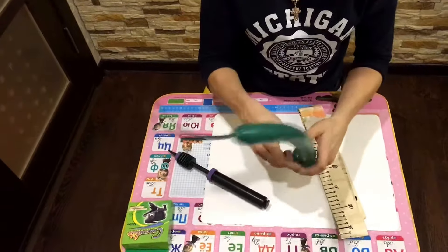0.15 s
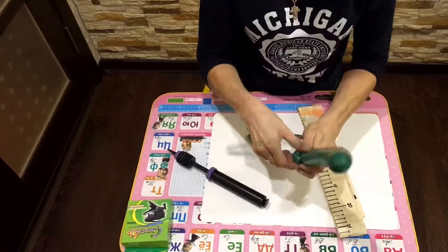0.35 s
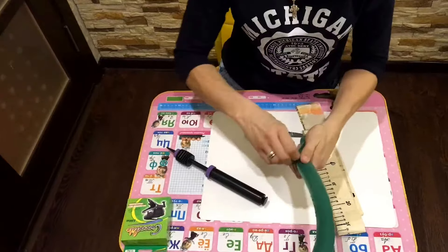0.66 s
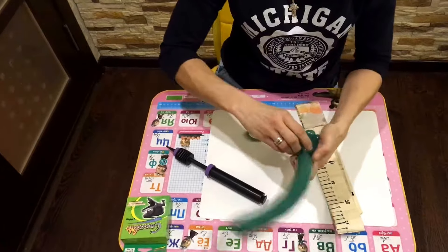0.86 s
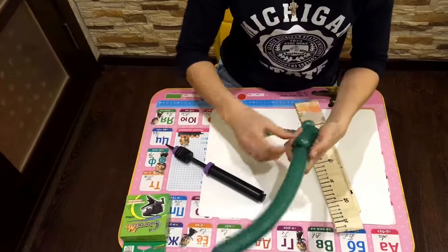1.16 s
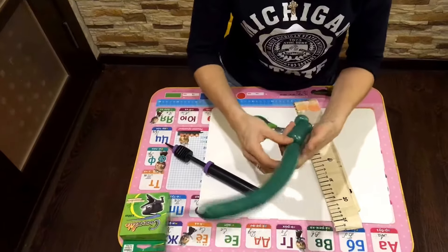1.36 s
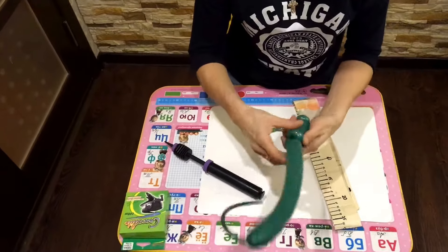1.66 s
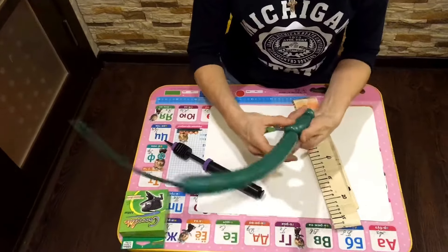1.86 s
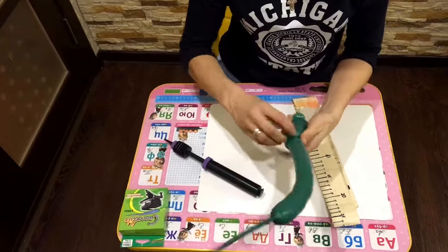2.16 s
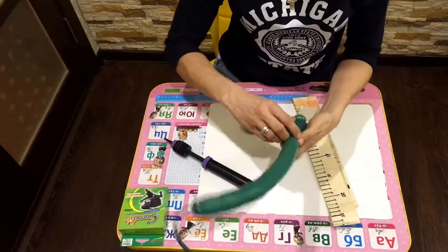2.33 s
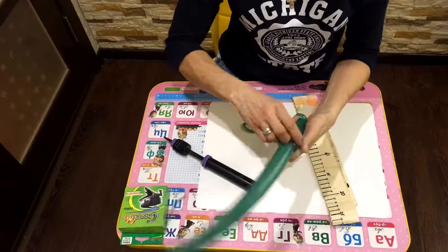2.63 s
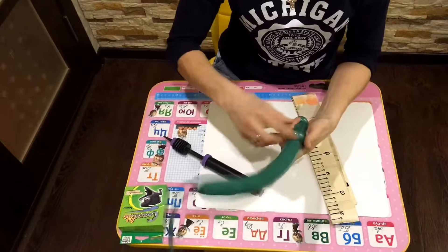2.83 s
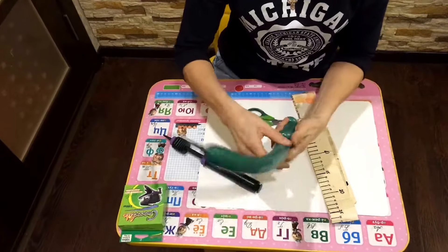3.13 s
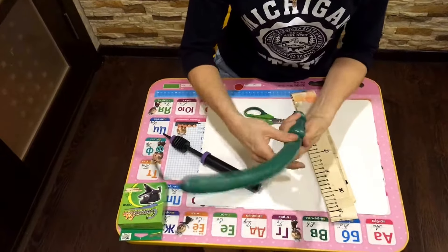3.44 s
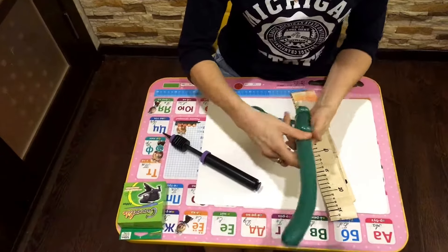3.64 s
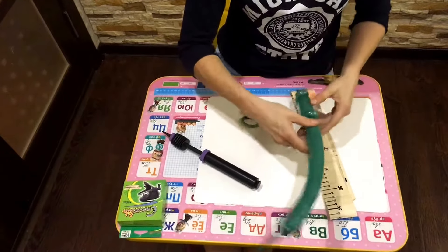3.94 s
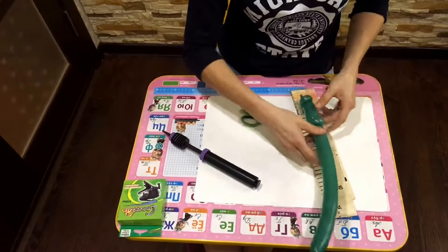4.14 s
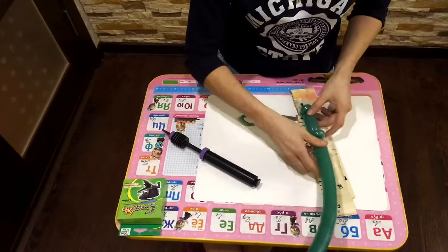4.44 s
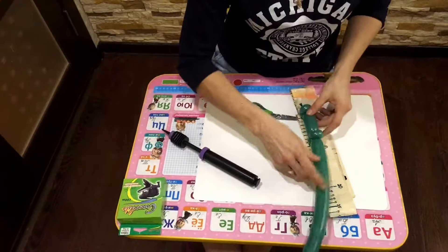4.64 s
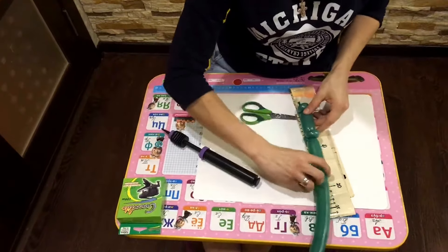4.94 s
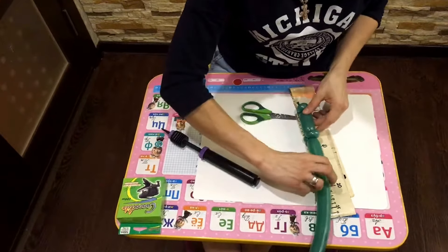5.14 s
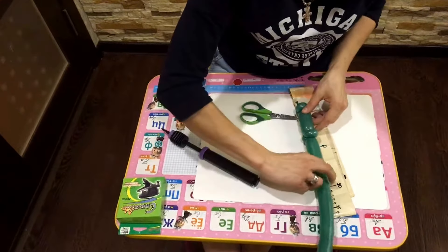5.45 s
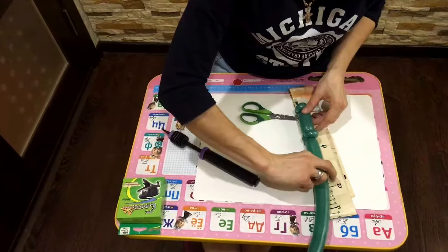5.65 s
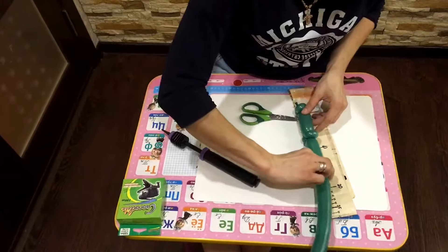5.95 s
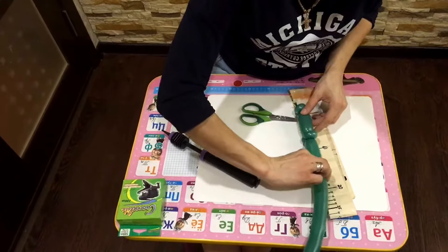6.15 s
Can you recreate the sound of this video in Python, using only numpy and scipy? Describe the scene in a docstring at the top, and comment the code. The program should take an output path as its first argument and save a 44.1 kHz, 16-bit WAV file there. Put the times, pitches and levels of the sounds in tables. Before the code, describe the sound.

A long latex balloon is handled nearby in a small, quiet room with a short echo. From the start until about 3.8 seconds, hands twist it in irregular bursts: bright friction crackles, duller rubbing, sharp snaps and soft knocks that make the air inside hum. The strongest snaps come near 0.6, 1.9, 2.5 and 3.4 seconds. Brief rasps, tiny squawks and thin wavering whines appear among them, and a short squeak rises and falls at 3.3 seconds. From 4 seconds the sound becomes softer as a palm brushes along the balloon, with a low murmur and a few light bumps. A faint hiss runs from about 4.5 to 5.4 seconds, and a nudged ruler rings faintly between 4.5 and 4.9. Short juddering finger strokes continue over the skin, with little squawks near 5.8 seconds, before the rubbing fades around 6.3 seconds.

```python
"""A long latex balloon is twisted by hand over a table in a small quiet room.
From the start the stretched rubber sticks and slips: friction crackles, the air tube murmurs, knocks
bounce along it and bright snaps break loose. Rasps, squawks and thin whines join within the first
second, and a short squeak comes at 3.3 s. From 4 s a palm smooths the balloon flat along a ruler;
from 4.5 s it hisses faintly, soft finger strokes judder over the skin and the nudged ruler rings."""
import sys
import numpy as np
from scipy import signal
from scipy.fft import rfft, irfft, next_fast_len
from scipy.io import wavfile
from scipy.ndimage import uniform_filter1d

SR = 44100
rng = np.random.default_rng(int(sys.argv[2]) if len(sys.argv) > 2 else 0)


def store_wav(level_fs):
    """Save 16-bit WAV to argv[1]."""
    pcm = np.round(np.clip(np.atleast_2d(level_fs), -1, 1) * 32767)
    wavfile.write(sys.argv[1], SR, pcm.T.astype(np.int16))


N = 277389
TIME = np.arange(N) / SR


def from_db(db):
    """Decibels to gain."""
    return 10 ** (np.asarray(db) / 20)


def rms_one(x):
    """Scale to unit rms."""
    return x / np.sqrt(np.mean(x ** 2) + 1e-20)


def gain_curve(rows, column):
    """A dB column as gain over time, silent outside its rows."""
    rows = np.array(rows)
    return from_db(np.interp(TIME, rows[:, 0], rows[:, column], left=-120, right=-120))


def at_hz(points, hz):
    """Read a table on a log-frequency axis."""
    points = np.array(points)
    return np.interp(np.log(hz + 1), np.log(points[:, 0]), points[:, 1])


def coloured(x, spectrum):
    """Give a signal a smooth spectral shape."""
    size = next_fast_len(N + SR // 10)
    gain = from_db(at_hz(spectrum, np.fft.rfftfreq(size, 1 / SR)))
    return irfft(rfft(x, size) * gain, size)[:N]


def band(x, low_hz, high_hz, order=2):
    """Causal band-pass."""
    high_hz = min(high_hz, SR * .47)
    low_hz = min(low_hz, high_hz / 2)
    return signal.sosfilt(signal.butter(order, [low_hz, high_hz], "band", fs=SR, output="sos"), x)


def resonance(x, hz, q):
    """One resonant band, unit gain at its peak."""
    return signal.lfilter(*signal.iirpeak(hz, q, SR), x)


def resonate(x, modes):
    """A sound plus the hum it leaves in the tube's air."""
    return x + sum(from_db(db) * resonance(x, hz, q=hz / width_hz) for hz, width_hz, db in modes)


def add(out, start_s, sound):
    """Mix a sound in at its start time."""
    start = max(0, round(start_s * SR))
    out[start:start + len(sound)] += sound[:max(0, N - start)]


def pressure(length_s, rise_s, fall_s):
    """A contact breaks away, slides for a while and stops."""
    t = TIME[:SR * 3 // 4]
    return (1 - np.exp(-t / rise_s)) * np.exp(-np.maximum(t - length_s, 0) / fall_s)


def contacts(rows, column, rise_s, fall_s):
    """Gain over time of contacts that each swell, hold a level and fade."""
    out = np.zeros(N)
    for row in rows:
        start_s, length_s = row[:2]
        add(out, start_s, from_db(row[column]) * pressure(length_s, rise_s, fall_s))
    return out


def tremble(size, window_samples):
    """A fast random wander; rms 1."""
    return rms_one(uniform_filter1d(rng.standard_normal(size), size=window_samples))


def drift(per_s):
    """A slow random wander."""
    steps = rng.standard_normal(2048)
    return np.interp(TIME * per_s, np.arange(len(steps)), steps)


def shifting(x, depth_db, per_s):
    """The skin's close resonances come and go as the grip changes its tension; rms 1."""
    return rms_one(sum((-1) ** k * from_db(depth_db * drift(per_s)) * resonance(x, hz, q=7)
                       for k, hz in enumerate(np.geomspace(450, 15000, 22))))


def slip_noise(slip_energy, slip_s, smooth):
    """Each slip is a dying noise burst, over a share of smooth sliding; rms 1."""
    power = signal.lfilter([1], [1, -np.exp(-2 / (slip_s * SR))], slip_energy + 1e-18)
    return rms_one(np.sqrt(power / power.mean() + smooth) * rng.standard_normal(len(power)))


def friction(per_s, spread_db, slip_s, smooth):
    """Micro-slips at random times; rms 1."""
    sizes = from_db(spread_db * np.minimum(rng.exponential(1, N), 3))
    slipping = rng.random(N) < per_s / SR
    return slip_noise(slipping * sizes ** 2, slip_s, smooth)


def slip_train(per_s, size, jitter, spread_db, slip_s, smooth):
    """Stick and slip in an uneven rhythm; rms 1."""
    gaps, sizes = rng.standard_normal((2, 2400))
    onsets = (np.cumsum(np.exp(jitter * gaps)) * SR / per_s).astype(int)
    inside = onsets < size
    slip_energy = np.zeros(size)
    slip_energy[onsets[inside]] = from_db(spread_db * np.clip(sizes[inside], -1.5, 1.5)) ** 2
    return slip_noise(slip_energy, slip_s, smooth)


def burst(centre_hz, decay_s, width, crack):
    """One release: a sharp crack and a dying shiver of the skin, in a broad band."""
    t = TIME[:SR // 20]
    fade = np.exp(-t / decay_s)
    shiver = rng.standard_normal(len(t)) * fade
    shiver[2] += crack
    # slack skin scatters the pulse in time and favours no frequency
    phases = np.angle(rfft(shiver, 2 * len(t)))
    scattered = irfft(np.exp(1j * phases))[:len(t)]
    sound = band(scattered, centre_hz / width, centre_hz * width, order=1)
    sound = band(sound, centre_hz / width ** 2, SR / 2, order=1)
    return rms_one(sound) * np.sqrt(np.mean(fade ** 2))


def ring(hz, decay_cycles=3.5):
    """The taut skin swings on at one pitch and dies away."""
    cycles = hz * TIME[:SR // 5]
    return np.sin(2 * np.pi * cycles) * np.exp(-cycles / decay_cycles)


# Background spectrum. Each row: frequency in Hz, gain in dB.
AIR_SPECTRUM = [(18, -60), (35, -9.5), (123, -7), (225, -14), (360, -17), (2910, -23), (15500, -36)]


def still_air(level_db=-71):
    """The quiet room's steady, low noise."""
    return from_db(level_db) * rms_one(coloured(rng.standard_normal(N), AIR_SPECTRUM))


# The hands grip and turn. Each row: start in seconds, length in seconds, crackle in dB, rub in dB,
# relative tube murmur in dB.
TWISTS = [(0, 0.32, -54.5, -62, -62), (.355, 0.096, -55, -59, -95), (.54, 0.26, -49.5, -64, -66),
          (.872, 0.049, -53, -52.5, -54.5), (1.0, 0.2, -58.5, -64, -84), (1.165, 0.09, -75, -60, -55),
          (1.41, 0.24, -63.5, -61, -58.5), (1.7, 0.38, -63, -68, -74), (1.81, 0.13, -52, -59, -82),
          (2.04, 0.21, -62, -66.5, -70), (2.275, 0.079, -49.5, -61.5, -61.5),
          (2.357, 0.053, -53, -54.5, -65), (2.43, 0.061, -50, -52.5, -60.5), (2.55, 0.21, -56.5, -69, -90),
          (2.668, 0.076, -52, -53, -59.5), (2.84, 0.075, -55, -60.5, -58.5),
          (3.04, 0.23, -67, -75.5, -71.5), (3.315, 0.14, -60, -73, -77), (3.41, 0.26, -56.5, -63.5, -68.5),
          (3.715, 0.12, -63.5, -59.5, -55.5)]
# Friction spectra. Each row: frequency in Hz, gain in dB.
CRACKLE_SPECTRUM = [(700, -32.5), (1400, -23.5), (1800, 6.5), (2300, 8), (4000, 7.5), (7000, 6), (9500, 4),
                    (10500, 0.5), (12500, 1.5), (15500, -7.5)]
RUB_SPECTRUM = [(200, -14), (400, -4.5), (800, 2.5), (1300, 1), (2000, 2.5), (3000, -31.5), (6000, -15.5)]
GRIP_S, LET_GO_S = 0.0011, 0.03


def twisting():
    """Rubber on rubber crackles brightly; the gripping fingers add a duller rub."""
    fine = friction(per_s=200, spread_db=3.5, slip_s=.0008, smooth=.15)
    fine = shifting(fine, depth_db=2.4, per_s=40)
    coarse = friction(per_s=130, spread_db=2.5, slip_s=.004, smooth=.3)
    crackle = contacts(TWISTS, 2, GRIP_S, LET_GO_S) * rms_one(coloured(fine, CRACKLE_SPECTRUM))
    rub = contacts(TWISTS, 3, GRIP_S, LET_GO_S) * rms_one(coloured(coarse, RUB_SPECTRUM))
    return crackle + rub


# Murmur as the tube is laid down. Each row: time in seconds, relative level in dB.
LAYING_DOWN = [(4.0, -75), (4.3, -66), (4.69, -66), (4.8, -68.5), (5.15, -74.5), (6.05, -66), (6.29, -83)]
# Murmur spectrum. Each row: frequency in Hz, gain in dB.
MURMUR_SPECTRUM = [(25, -29), (50, -3.5), (100, -6), (150, -5), (190, -2.5), (275, 0.5), (370, -6.5),
                   (520, -17.5), (1000, -48)]


def murmur():
    """Soft bumps of the hands set the tube murmuring, with each twist and as it is laid down."""
    bumps = friction(per_s=70, spread_db=1.5, slip_s=.012, smooth=.4)
    sway = contacts(TWISTS, column=4, rise_s=0.0059, fall_s=0.093) + gain_curve(LAYING_DOWN, column=1)
    return from_db(-2.5) * sway * rms_one(coloured(bumps, MURMUR_SPECTRUM))


# The tube is flicked or released. Each row: start in seconds, relative thud in dB, pitch in Hz,
# relative ring in dB.
KNOCKS = [(.002, -41.5, 1210, -44), (.191, -38, 860, -42.5), (0.204, -42.5, 106, -57),
          (.294, -54, 980, -41), (.875, -34, 1480, -41), (1.129, -42.5, 1240, -50),
          (1.186, -38, 407, -36.5), (1.186, -36, 1130, -37.5), (1.401, -47, 1130, -62),
          (1.436, -38, 890, -43), (1.491, -34, 1070, -41), (1.871, -38.5, 1470, -35),
          (2.084, -38, 1620, -30.5), (2.154, -34.5, 1190, -34), (2.156, -37, 587, -38.5),
          (2.274, -43, 1006, -39.5), (2.667, -53, 1850, -43), (3.0378, -39, 1610, -34),
          (3.148, -46, 393, -49.5), (3.416, -43, 2180, -32.5), (3.562, -57, 780, -47.5),
          (3.579, -48.5, 97, -62), (3.678, -40, 1470, -64), (3.718, -34, 1475, -30),
          (3.86, -40.5, 1740, -39), (4.164, -49, 1090, -49), (4.389, -52, 1260, -57),
          (4.578, -45.5, 305, -60), (4.639, -48.5, 1900, -54), (4.676, -48, 147.5, -50),
          (4.848, -46, 384, -52), (4.93, -42.5, 1368, -45), (4.932, -55, 370, -50)]


def knocks(round_trip_s=.0046, end_reflection=0.22):
    """Dull releases shake the air, bounce between the tube's ends and leave the skin ringing."""
    out = np.zeros(N)
    for start_s, thud_db, pitch_hz, ring_db in KNOCKS:
        thud = burst(pitch_hz, decay_s=0.0058, width=2.52, crack=1.6)
        thud = band(thud, 66, pitch_hz * 2, order=1)
        air_thump = from_db(-12) * burst(centre_hz=320, decay_s=0.0057, width=1.6, crack=3.6)
        pulse = from_db(thud_db) * (thud + air_thump)
        trip_s = round_trip_s * rng.uniform(.85, 1.15)
        for trip in range(4):
            add(out, start_s + trip * trip_s, end_reflection ** trip * pulse)
        add(out, start_s, from_db(ring_db) * ring(pitch_hz))
    return from_db(1.14) * out


# Modes of the enclosed air. Each row: frequency in Hz, bandwidth in Hz, gain in dB.
TUBE_MODES = [(148, 2.5, -3), (296, 8.2, -1.5)]


def air_tube():
    """Knocks and murmur make the enclosed air hum."""
    return resonate(knocks() + murmur(), TUBE_MODES)


# Rubber lets go suddenly. Each row: start in seconds, relative level in dB, centre in Hz,
# crack from about 1 (soft tear) to 9 (hard click).
SNAPS = [(0.115, -24.5, 9300, 4.6), (0.275, -40, 8260, 4), (0.362, -30, 5580, 1.5), (0.4053, -31, 6450, 4),
         (0.4168, -35, 5370, 3), (0.432, -30.5, 4870, 3), (0.4796, -27.5, 5640, 3),
         (0.5388, -28.5, 6960, 1), (0.5458, -18.5, 6060, 1.8), (0.5501, -26, 6600, 3),
         (0.5824, -14.5, 7000, 8.2), (0.5928, -34, 6060, 4.3), (0.605, -27, 6000, 5),
         (0.631, -34, 5800, 3.3), (0.67, -29.5, 5550, 1.1), (0.7036, -19, 7760, 0.86),
         (0.7388, -29.5, 6700, 3.3), (0.791, -23.5, 6500, .6), (0.845, -34, 6500, 2.5),
         (0.874, -26, 4760, 5.4), (0.9455, -33, 8750, 2.4), (1.0545, -36, 4850, 1.6), (1.098, -31, 7100, 4),
         (1.104, -31.5, 6900, 4), (1.2084, -26, 6500, 2.2), (1.3552, -46.5, 6400, 2),
         (1.421, -37.5, 5050, 2), (1.6985, -36.5, 5450, 2.4), (1.769, -42, 8200, 4), (1.82, -32.5, 5530, 2),
         (1.869, -13.5, 6100, 5), (2.061, -27.5, 5130, 3), (2.156, -30, 6340, 8.8),
         (2.367, -30, 6500, 0.83), (2.38, -30.5, 5230, 1.5), (2.388, -30.5, 6000, 1.2),
         (2.43, -26.5, 6100, .6), (2.4475, -26.5, 6500, 1.8), (2.4568, -25, 6200, 3),
         (2.4724, -24, 6350, 3), (2.485, -28, 6000, 3), (2.5092, -19, 6740, 4.4),
         (2.5201, -23.5, 7000, 4.8), (2.656, -31, 7050, 2.7), (2.6677, -30, 4200, 3),
         (2.742, -29, 4660, 1.4), (2.779, -30.5, 5770, 3), (3.036, -34.5, 3260, 2.3),
         (3.174, -34.5, 6500, 1.6), (3.22, -38.5, 5740, 2.2), (3.3998, -27.5, 6400, 1.7),
         (3.4144, -18, 7000, 2.8), (3.5607, -36.5, 4970, 2.4), (3.717, -25.5, 4300, 2.3)]
# Latex response, for snaps and rasps. Each row: frequency in Hz, gain in dB.
LATEX_RESPONSE = [(600, -0.5), (1500, 4.5), (2700, -1.5), (4000, -1), (6500, -5), (9500, -3.5),
                  (10400, -9.5), (11500, -3.5), (15500, -10.5)]


def snaps(ring_ratio=0.64, ring_db=-16.5, small_per_s=11, small_db=11, small_spread_db=1):
    """Rubber tears loose from rubber: loud snaps, and small ones at random while a twist lasts."""
    loud = np.zeros(N)
    for start_s, level_db, centre_hz, crack in SNAPS:
        tear = burst(centre_hz, decay_s=0.002, width=1.73, crack=crack)
        add(loud, start_s, from_db(level_db) * tear)
        add(loud, start_s, from_db(level_db + ring_db) * ring(centre_hz * ring_ratio))
    small_tear = burst(centre_hz=7000, decay_s=0.0018, width=3.7, crack=3)
    sizes = from_db(small_db + small_spread_db * rng.standard_normal(N))
    crackle_gain = contacts(TWISTS, 2, GRIP_S, LET_GO_S)
    slips = (rng.random(N) < small_per_s / SR) * sizes * crackle_gain
    small = signal.fftconvolve(slips, small_tear)[:N]
    return from_db(0.68) * coloured(loud + small, LATEX_RESPONSE)


# Rubber rasps over rubber; later the palm hisses faintly over the skin. Each row: start in seconds,
# length in seconds, relative level in dB, centre in Hz, slips per second.
RASPS = [(0.548, 0.044, -38.5, 6400, 220), (0.699, 0.061, -39.5, 7900, 260), (0.804, 0.032, -40, 6870, 170),
         (1.154, 0.036, -38, 4600, 600), (2.036, 0.021, -43, 3860, 253), (2.46, 0.043, -42.5, 5500, 250),
         (2.717, 0.057, -44, 4300, 148), (3.407, 0.016, -33, 5460, 620), (4, 0.12, -57.5, 7500, 550),
         (4.559, 0.79, -62.5, 10100, 540)]


def rasps(width=1.93):
    """Slips follow so closely that they rasp or hiss, the colour shifting with the tension."""
    out = np.zeros(N)
    for start_s, length_s, level_db, centre_hz, slips_per_s in RASPS:
        force = pressure(length_s, rise_s=0.0011, fall_s=0.015)
        grain = slip_train(slips_per_s, len(force), jitter=.25, spread_db=3, slip_s=.001, smooth=.2)
        rasp = band(grain, centre_hz / width, centre_hz * width, order=1)
        rasp = band(rasp, centre_hz / 4, SR / 2, order=1)
        add(out, start_s, from_db(level_db) * force * rms_one(rasp))
    return coloured(out.std() * shifting(out, depth_db=1.8, per_s=45), LATEX_RESPONSE)


# Short rough squawks. Each row: start in seconds, length in seconds, first pitch in Hz,
# last pitch in Hz, level in dB, overtones in dB relative to the fundamental.
SQUAWKS = [(0.668, 0.005, 4270, 4230, -32.5, -18), (1.486, 0.017, 1003, 1415, -42.5, -10.5),
           (2.056, 0.014, 3630, 3080, -43, -8), (5.753, 0.03, 1243, 1004, -52, -14),
           (5.796, 0.0104, 1385, 1453, -45, -2.5), (5.812, 0.019, 1320, 1630, -54, -22)]


def squawks(jitter=.13):
    """Slips almost lock into a cycle, each a little early or late."""
    out = np.zeros(N)
    for start_s, length_s, first_hz, last_hz, level_db, overtone_db in SQUAWKS:
        force = pressure(length_s, rise_s=0.00092, fall_s=0.0008)
        waver = tremble(len(force), window_samples=40)
        glide_hz = np.interp(TIME[:len(force)], [0, length_s], [first_hz, last_hz])
        phase = 2 * np.pi * np.cumsum(glide_hz * (1 + jitter * waver)) / SR
        overtones = from_db(overtone_db) * sum(np.sin(k * phase) for k in range(2, 5))
        add(out, start_s, from_db(level_db) * force * rms_one(np.sin(phase) + overtones))
    return out


# Thin wavering notes: the sliding skin sings, and the last row, at 4 s, is a brief ring near 2 kHz set off by a
# tap. Each row: start in seconds, length in seconds, pitch in Hz, level in dB, # waver as a share of the pitch.
WHINES = [(0.826, 0.031, 2240, -50, 0.067), (0.897, 0.033, 2080, -53.5, 0.068),
          (2.452, .14, 1948, -52.5, 0.088), (3.043, .06, 1827, -61, 0.09), (4.041, 0.14, 2006, -67, 0.032)]


def whines(overtone_ratio=1.4, overtone_db=-10):
    """Sliding keeps the taut skin on a thin, wavering note with one overtone; at 4 s a tap leaves a like, brief
    ring."""
    out = np.zeros(N)
    for start_s, length_s, hz, level_db, jitter in WHINES:
        force = pressure(length_s, rise_s=0.0013, fall_s=0.012)
        for ratio, partial_db in ((1, 0), (overtone_ratio, overtone_db)):
            waver = tremble(len(force), window_samples=130)
            flutter = 1 + .4 * tremble(len(force), window_samples=130)
            phase = 2 * np.pi * np.cumsum(hz * ratio * (1 + jitter * waver)) / SR
            add(out, start_s, from_db(level_db + partial_db) * force * flutter * np.sin(phase))
    return out


# Course of one squeak. Each row: time in seconds, pitch in Hz, level in dB.
SQUEAK_PATH = [(3.311, 807, -103), (3.316, 772, -62), (3.324, 759, -55), (3.337, 1012, -50),
               (3.348, 917, -61), (3.360, 716, -54), (3.368, 630, -91)]
# The squeaking skin's response. Each row: frequency in Hz, gain in dB.
SKIN_RESPONSE = [(900, 5), (2000, -2), (2550, -9.5), (3100, -6.5), (6000, -17)]


def squeak(jitter=0.02, roughness=.22):
    """Slips briefly lock into a cycle of uneven strength, whose pitch follows the sliding speed."""
    times_s, pitches_hz, _ = np.transpose(SQUEAK_PATH)
    waver = tremble(N, window_samples=80)
    flutter = 1 + roughness * tremble(N, window_samples=80)
    hz = np.interp(TIME, times_s, pitches_hz)
    phase = 2 * np.pi * np.cumsum(hz * (1 + jitter * waver)) / SR
    tone = sum(from_db(at_hz(SKIN_RESPONSE, k * hz)) * np.sin(k * phase) for k in range(1, 9))
    return gain_curve(SQUEAK_PATH, column=2) * rms_one(tone * flutter)


# The palm presses the balloon flat. Each row: time in seconds, relative level in dB.
PALM_PRESSURE = [(4.0, -52), (4.17, -55.5), (4.23, -63), (4.48, -62.5), (4.56, -54), (4.82, -56),
                 (4.88, -52), (5.55, -48.5), (6.05, -75)]
# Spectrum of a hand on latex. Each row: frequency in Hz, gain in dB.
HAND_SPECTRUM = [(150, -25), (320, 12), (480, -10), (620, 3.5), (850, -2.5), (1200, 1), (2000, -2),
                 (3700, -3.5), (5800, -3.5), (7600, -10), (15500, -11)]


def palm_brush():
    """The palm brushes along the balloon in fine, dense slips."""
    grain = friction(per_s=500, spread_db=2.2, slip_s=.001, smooth=.7)
    grain = shifting(grain, depth_db=2.5, per_s=25)
    brush = rms_one(coloured(grain, HAND_SPECTRUM))
    return from_db(-10.5) * gain_curve(PALM_PRESSURE, column=1) * brush


# Finger strokes. Each row: start in seconds, length in seconds, relative level in dB, squeal in Hz.
STROKES = [(4.506, 0.017, -58.5, 3000), (4.637, 0.013, -52, 3750), (4.844, 0.015, -50.5, 3860),
           (5.033, 0.03, -55, 3820), (5.063, 0.013, -46.5, 2940), (5.116, 0.026, -55, 3840),
           (5.191, 0.033, -49, 3900), (5.306, 0.025, -48, 3470), (5.334, 0.039, -47.5, 3050),
           (5.401, 0.014, -49.5, 4000), (5.44, 0.025, -49, 4440), (5.505, 0.017, -46, 4050),
           (5.637, 0.031, -49, 5440), (5.712, 0.018, -46.5, 5900), (5.744, 0.016, -46, 4570),
           (5.8, 0.0082, -43, 4440), (5.89, 0.023, -53.5, 5470), (6.245, 0.037, -65.5, 4960)]
# Modes of the stroked tube. Each row: frequency in Hz, bandwidth in Hz, gain in dB.
HOLLOW_MODES = [(1150, 70, -5), (2000, 250, -3), (3940, 190, -4)]


def finger_strokes(squeal_db=-12, top_ratio=3.35):
    """A finger judders over the hollow tube; the patch of skin under it squeals at its own pitch."""
    out = np.zeros(N)
    judder = slip_train(per_s=420, size=N, jitter=.45, spread_db=1.5, slip_s=.0016, smooth=.45)
    hollow = resonate(coloured(judder, HAND_SPECTRUM), HOLLOW_MODES)
    for start_s, length_s, level_db, squeal_hz in STROKES:
        force = pressure(length_s, rise_s=0.0028, fall_s=0.0039)
        stretch = np.roll(hollow, -round(start_s * SR))[:len(force)]
        rub = rms_one(band(stretch, 380, squeal_hz * top_ratio))
        squeal = from_db(squeal_db) * rms_one(resonance(rub, squeal_hz, q=5))
        add(out, start_s, from_db(level_db) * force * (rub + squeal))
    return from_db(-1.5) * out


# Nudges of the ruler. Each row: start in seconds, level in dB.
RULER_TAPS = [(4.508, -66), (4.576, -62), (4.639, -53), (4.848, -56.5)]
# Ruler modes. Each row: frequency in Hz, gain in dB, T60 in seconds.
RULER_MODES = [(1916, 1.5, 0.4), (3650, -9.5, 0.55), (5700, -22, 0.43)]


def ruler():
    """Each nudge sets the ruler's few modes ringing."""
    out, t = np.zeros(N), TIME[:SR]
    for start_s, tap_db in RULER_TAPS:
        for hz, mode_db, t60_s in RULER_MODES:
            add(out, start_s, from_db(tap_db + mode_db - 60 * t / t60_s) * np.sin(2 * np.pi * hz * t))
    return out


# Room decay. Each row: frequency in Hz, T60 in seconds.
ROOM_T60 = [(150, 0.43), (500, 0.25), (1400, 0.35), (15000, 0.29)]


def room(x, wet_db=-3.0, first_echo_s=0.0011):
    """Diffuse reflections last longest in the bass; their pattern changes as the balloon swings about."""
    t, block = TIME[:SR // 2], SR // 6
    starts = range(0, N, block)
    edges_hz = np.geomspace(60, 18000, 10)
    tails = np.zeros((len(starts), len(t)))
    for low_hz, high_hz in zip(edges_hz, edges_hz[1:]):
        t60_s = at_hz(ROOM_T60, np.sqrt(low_hz * high_hz))
        tails += band(rng.standard_normal(tails.shape), low_hz, high_hz) * from_db(-60 * t / t60_s)
    tails *= np.clip(t / first_echo_s - .5, 0, 1)
    out = np.zeros(N)
    for start, tail in zip(starts, tails):
        add(out, start / SR, signal.fftconvolve(x[start:start + block], tail / np.linalg.norm(tail)))
    return from_db(wet_db) * out


def scene():
    """The balloon, its room, the ruler and the still air, in mono."""
    balloon = (squeak() + squawks() + air_tube() + snaps() + rasps() + twisting()
               + palm_brush() + finger_strokes() + whines())
    return (still_air() + balloon + room(balloon) + ruler())[None]


def record(dry):
    """A steep low-pass cuts the top."""
    cutoff_hz = 15550
    return signal.sosfilt(signal.ellip(12, .1, 80, cutoff_hz, fs=SR, output="sos"), dry)


dry = scene()
out = record(dry)
store_wav(out)
```